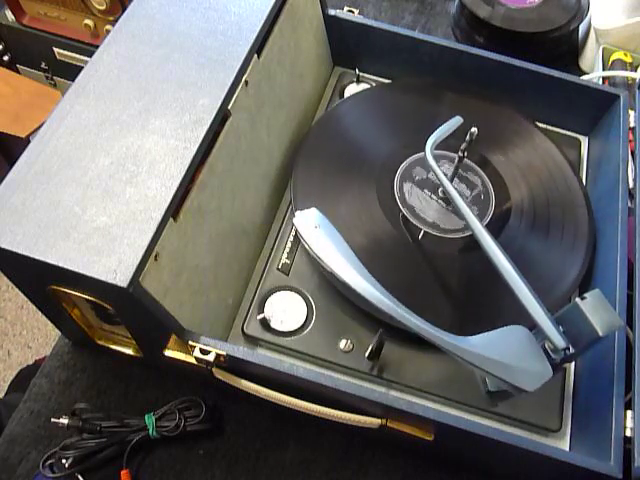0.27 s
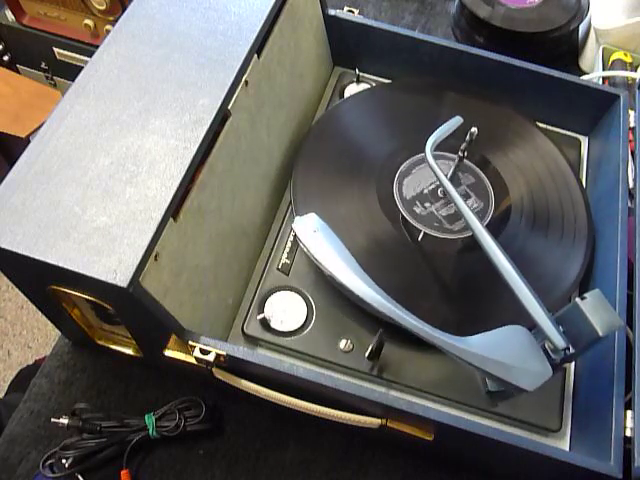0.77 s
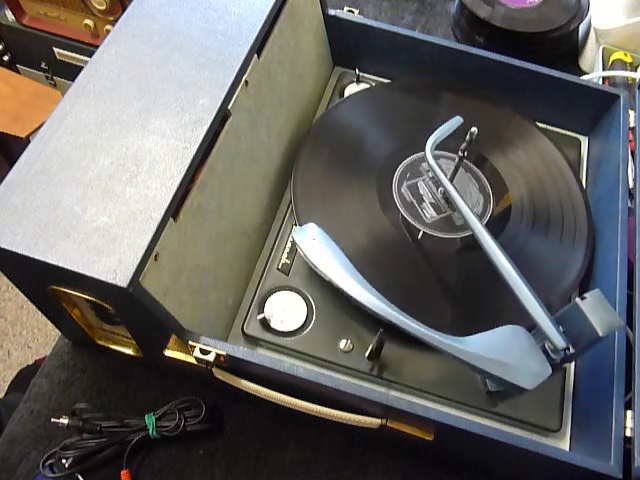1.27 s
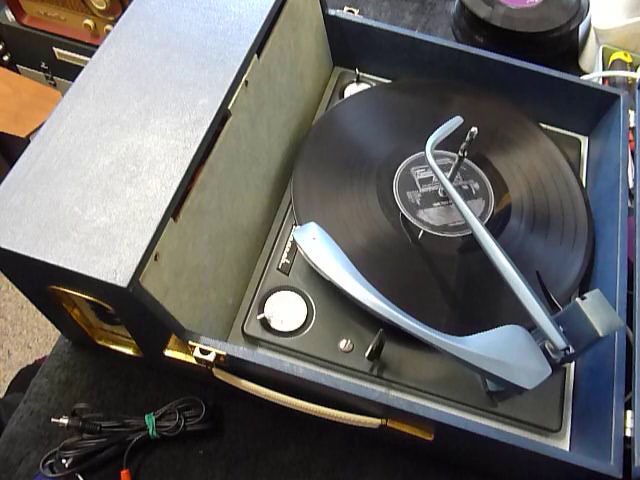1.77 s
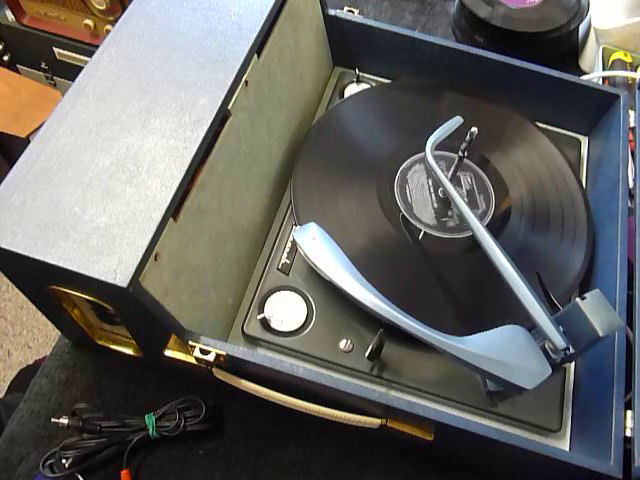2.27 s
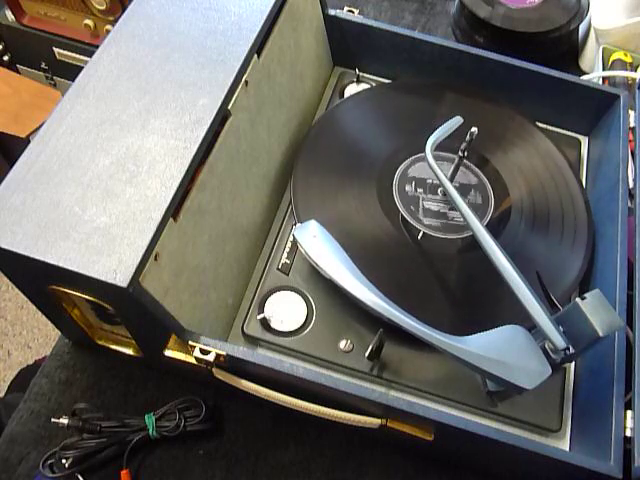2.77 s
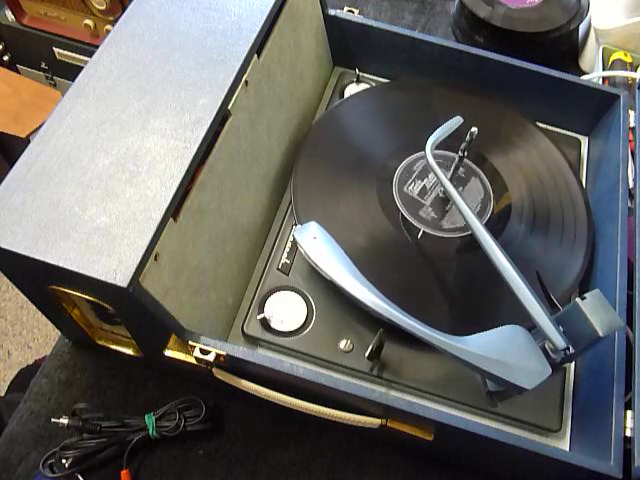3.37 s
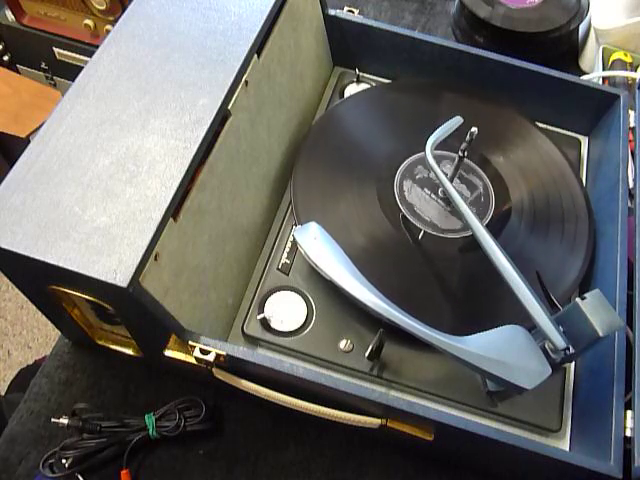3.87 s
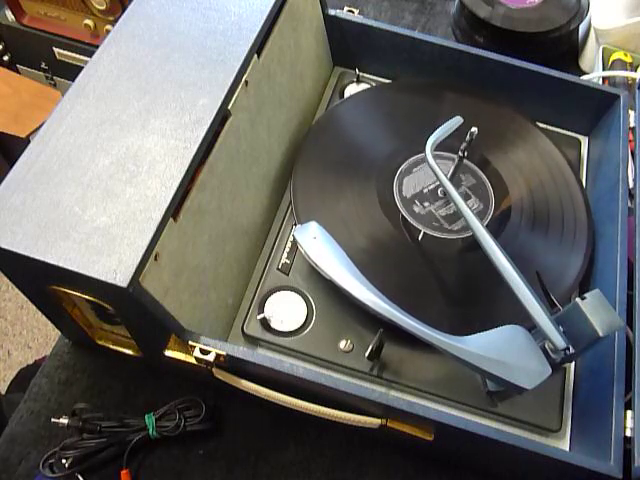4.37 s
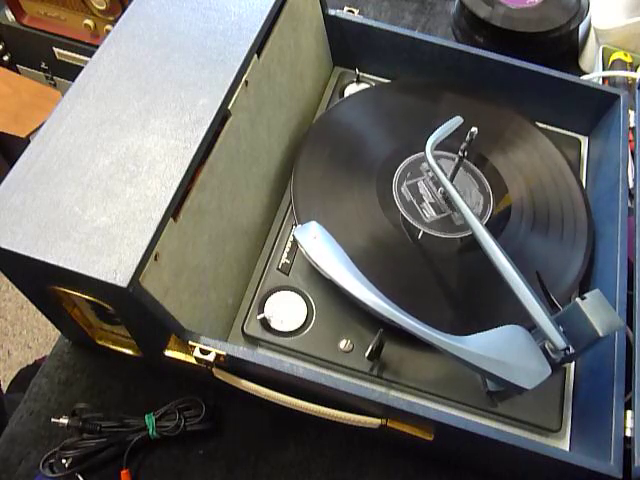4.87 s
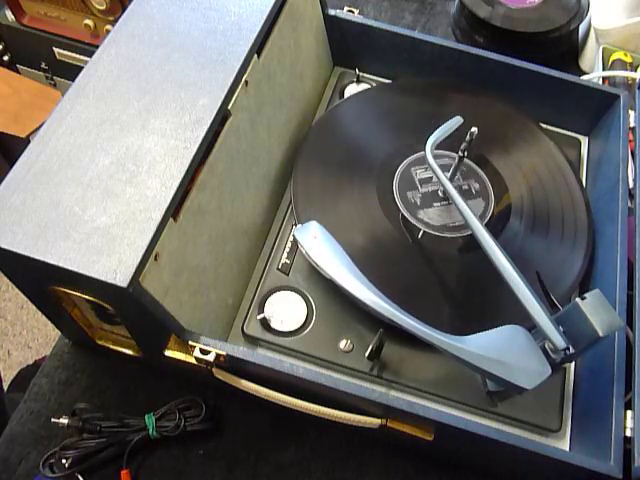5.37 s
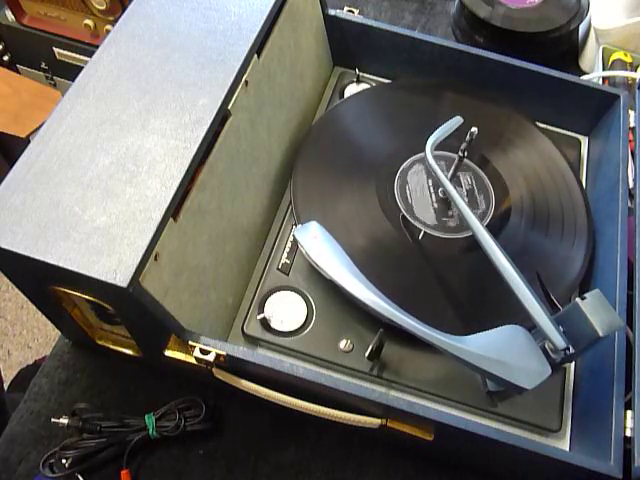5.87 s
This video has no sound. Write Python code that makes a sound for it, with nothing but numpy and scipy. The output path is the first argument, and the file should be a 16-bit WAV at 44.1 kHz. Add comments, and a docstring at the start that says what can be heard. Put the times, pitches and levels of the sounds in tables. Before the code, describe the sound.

A portable record changer's levers slide, snap and knock in a burst near the start, then faint ticks over low hiss until one last knock.

```python
"""Record changer at work

Close on a portable record player in a quiet room: levers slide, snap and knock on its steel deck, set in
a wooden case. Blows ring each part's modes over a noisy rattle; a dragging lever is lumpy resonant noise.
The drive ticks faintly as the platter turns, each tick a burst of noise in three resonant bands.
Under it lie mains hum and a thin electrical whine, both wavering sines, and the shaped-noise hiss of
room and microphone. A short room tail follows the mechanism; the microphone rolls off the treble."""
import sys
import numpy as np
from scipy import signal
from scipy.fft import rfft, irfft, next_fast_len
from scipy.io import wavfile
from scipy.ndimage import uniform_filter1d, map_coordinates

SR = 44100
rng = np.random.default_rng(int(sys.argv[2]) if len(sys.argv) > 2 else 0)


def unload_wav(signal):
    """Save mono or channel-first audio to the path in sys.argv[1] as 16-bit WAV at rate SR, clipped to [-1, 1]."""
    wavfile.write(
        sys.argv[1],
        SR,
        np.round(np.clip(np.atleast_2d(signal).T, -1, 1) * 32767).astype(np.int16),
    )


N = 270509

# Mains harmonics of the motor, mean levels: pitch_hz, rms_level_db
MOTOR_HUM = [(99.9, -70), (149.8, -73), (199.5, -66), (249.9, -70)]
# Thin electrical whine, mean levels: pitch_hz, rms_level_db
ELECTRICAL_WHINE = [(2667, -85.5), (3111, -85.5), (3555, -85.5), (6222, -88), (6667, -88.5), (7887, -82)]
# Spectrum shape of room and microphone hiss: pitch_hz, relative_density_db
HISS_SPECTRUM = [(15, -41.5), (25, -26.5), (70, -21), (135, -10.5), (170, -15.5), (225, -13), (472, -17.5),
                 (674, -20.5), (1010, -24), (3540, -34), (6520, -40), (9500, -35.5)]
HISS_DB = -53  # mean rms level

# Faint ticks of the turning drive: start_s, pip_peak_db, pip_pitch_hz, knock_db (low knock over the pip)
DRIVE_TICKS = [(0.7136, -48, 3420, -20), (1.1174, -54, 2550, -10), (1.216, -58.5, 3520, -12),
               (2.003, -54, 3180, -10), (2.226, -59, 6200, -22), (2.406, -58, 2900, -2),
               (2.621, -48.5, 3100, 5), (2.8835, -48.5, 3140, 6), (3.3228, -50.5, 3200, 3),
               (3.3384, -55.5, 3500, -4), (3.511, -55, 2980, 3), (3.5853, -53, 3140, -3),
               (3.76, -58, 3200, -5), (4.04, -56, 3200, -9), (4.35, -55, 3200, -6), (4.423, -53.5, 3230, 4),
               (4.701, -62, 2870, 15), (4.7327, -50, 2830, 8), (5.091, -51.5, 3200, -5),
               (5.239, -54, 3320, -9), (5.338, -59, 2370, 12), (5.4125, -55, 3180, -5),
               (5.538, -42.5, 3420, -17), (5.895, -50.5, 3040, -3.5)]
PUFF_OVER_DB, PUFF_TOP_DB = 8, 2  # puff level above the knock, and its ceiling above the pip
TICK_T60_S, LONGER_DB = 0.085, 0.4  # decay at 0 dB knock; dB of length per dB of knock

# Dying of the room tail: pitch_hz, t60_s
ROOM_DECAY = [(150, 0.21), (1000, 0.17), (8000, 0.14)]

# Blows of the mechanism: start_s, case_db, board_db, plate_db, light_parts_db,
# brightness_octaves (above the bracket, where light parts lose nothing), rattle_t60_s
MECHANISM_BLOWS = [(0.7946, -67, -60, -49, -41, 1.3, .04), (0.8206, -66, -58, -41, -38.5, 1.36, 0.045),
                   (1.2925, -57, -37, -59, -47, -.2, 0.068), (1.3194, -50, -30, -39, -28, 1.5, .045),
                   (1.342, -61, -47, -44, -37, 0.7, 0.035), (1.355, -60, -48, -48, -41, -1.5, .04),
                   (1.3749, -27, -16.5, -36, -43, -0.5, 0.094), (1.604, -60, -49, -46, -48.5, 1.2, 0.04),
                   (1.626, -61, -35, -32, -30.5, -.2, 0.057),
                   (1.6513, -50, -39.5, -30.5, -21.5, -0.03, 0.051),
                   (1.6830, -35.5, -37, -30, -15, 1.5, .057), (1.6879, -30.5, -29, -28.5, -26, 0.5, 0.074),
                   (1.784, -66, -50, -44, -44, 0, .055), (1.8528, -22, -47, -20.5, -20, 1.63, 0.078),
                   (1.8591, -22, -38, -14, -28.5, 0, 0.04), (5.9460, -39, -28.5, -30.5, -36, -0.3, .066),
                   (5.979, -62, -54, -53, -43.5, -0.1, .04)]
# Modes of the wooden case: pitch_hz, relative_level_db, t60_s
CASE_MODES = [(138.2, -0.5, 0.24), (202.6, -8.5, 0.35), (345, 0.5, 0.24), (426.5, 6.5, 0.091),
              (513, -12.5, 0.13)]
# Modes of the sprung motor board: pitch_hz, relative_level_db, t60_s
BOARD_MODES = [(92, -4, 0.066), (153, -3.5, 0.048), (225, 3, 0.06), (324.5, -3, 0.077), (414, -7, 0.11),
               (490, -10, 0.04), (644, -10, 0.064)]
# Modes of the plate: pitch_hz, relative_level_db, t60_s
PLATE_MODES = [(640, -13, 0.0093), (782, -2, 0.046), (832, -8, 0.073), (1010, -7.5, 0.017),
               (1217, -4.5, 0.07)]
# Modes of the bracket: pitch_hz, relative_level_db, t60_s
BRACKET_MODES = [(1350, -2.5, 0.017), (1540, 0.5, 0.027), (1695, 4, 0.082), (1914, 1, 0.081),
                 (2154, -2, .05)]
# Modes of the steel deck: pitch_hz, relative_level_db, t60_s
DECK_MODES = [(2376, 0.5, 0.045), (2580, 2, 0.031), (2810, 5.5, 0.065), (3290, -0.5, 0.075),
              (3450, 4.5, 0.042), (4000, 0.5, 0.039), (4270, -1, 0.033)]
# Modes of the lever: pitch_hz, relative_level_db, t60_s
LEVER_MODES = [(4800, -11, .04), (5480, -7, .04), (6040, -2.5, 0.056), (5920, -1.5, 0.078),
               (6070, -14.5, 0.037), (6230, -8, 0.037), (6500, -13, 0.017), (7400, -20, 0.019)]
# Light parts (bracket, deck, lever in turn): octaves_above_bracket, readiness_db
LIGHT_PARTS = [(0, 3), (0.87, 1), (1.85, -2.5)]
RISE_S = 0.00071  # time constant of a contact building up
UNDER_DB, OVER_DB = 7.5, 10  # light-part loss: per octave below the brightness, per squared octave above

# A lever dragging along its cam: time_s, grind_rms_db (low), scrape_rms_db (bright)
LEVER_SLIDE = [(1.28, -70, -96), (1.30, -56, -57), (1.33, -47.5, -50), (1.36, -41.5, -51),
               (1.40, -51.5, -61.5), (1.45, -77, -68), (1.60, -78, -86), (1.64, -42.5, -69),
               (1.68, -43, -66), (1.71, -58, -54), (1.74, -51, -51), (1.80, -53, -69), (1.84, -77, -73.5)]

# Microphone treble roll-off: pitch_hz, gain_db
MIC_ROLLOFF = [(6800, -0.5), (7600, -6), (8200, -12), (8700, -27.5), (9000, -40)]
TOP_HZ = 9050  # band limit of the converter
OFFSET = .0069  # standing voltage of the converter, as a share of full scale


def amp(db):
    """Decibels to gain."""
    return 10 ** (np.asarray(db) / 20)


def unit(x):
    """Scaled to rms 1."""
    return x / np.sqrt(np.mean(x ** 2) + 1e-20)


def peak_one(x):
    """Scaled to peak 1."""
    return x / np.max(np.abs(x))


def along(points, hz):
    """Values between (Hz, value) points on a log frequency axis."""
    point_hz, values = np.transpose(points)
    return np.interp(np.log(hz + 1), np.log(point_hz + 1), values)


def curves(rows):
    """One value per sample for each column after the time."""
    s, *columns = np.transpose(rows)
    return [np.interp(np.arange(N) / SR, s, column) for column in columns]


def wobble(rate):
    """A smooth random curve, rate knots a second."""
    knots = rng.standard_normal(int(N * rate / SR) + 4)
    return map_coordinates(knots, [np.arange(N) * rate / SR])


def filtered(x, response):
    """x through a complex response of frequency, padded so the ringing does not wrap."""
    m = next_fast_len(len(x) + 8192)
    return irfft(rfft(x, m) * response(np.fft.rfftfreq(m, 1 / SR)), m)[:len(x)]


def band(f, hz, width_hz):
    """One causal resonance."""
    return 1j * f * width_hz / (hz * hz - f * f + 1j * f * width_hz + 1e-9)


def add(track, s, sound):
    """Mix a sound in at s seconds."""
    track[round(s * SR):][:len(sound)] += sound


def tones(lines, waver_db, drift):
    """Hum or whine: steady sines whose level (dB) and phase (radians) wander a little."""
    t = np.arange(N) / SR
    total = np.zeros(N)
    for hz, db in lines:
        level = np.sqrt(2) * amp(db + waver_db * wobble(5.5))  # rms to peak
        phase = drift * wobble(3.5) + 2 * np.pi * rng.random()
        total += level * np.sin(2 * np.pi * hz * t + phase)
    return total


def hiss():
    """Room air, motor rumble and microphone noise: shaped noise with faint patches in time and pitch."""
    z = signal.stft(rng.standard_normal(N), nperseg=512)[2]
    patches = uniform_filter1d(rng.standard_normal(z.shape), size=8, axis=0)
    patches = uniform_filter1d(patches, size=10, axis=1)
    noise = signal.istft(z * amp(0.87 * unit(patches)), nperseg=512)[1][:N]
    shaped = unit(filtered(noise, lambda f: amp(along(HISS_SPECTRUM, f))))
    return amp(HISS_DB + 0.24 * wobble(7.4)) * shaped


def ticks():
    """A small part touches the deck: decaying noise wakes a short pip, a broad puff and a duller knock."""
    track, t = np.zeros(N + SR), np.arange(SR // 8) / SR
    for s, db, pip_hz, knock_db in DRIVE_TICKS:
        puff_db = min(knock_db + PUFF_OVER_DB, PUFF_TOP_DB)
        t60 = TICK_T60_S * amp(LONGER_DB * knock_db)  # a heavier tick lasts longer
        decay = amp(-60 * t / t60)
        sharpness = 1 + 1.2 * amp(-60 * t / 0.0051)  # sharpest at first contact
        touch = decay * sharpness * rng.standard_normal(len(t))

        def part(hz, width_hz):
            """The touch heard through a doubled resonance."""
            return peak_one(filtered(touch, lambda f: band(f, hz, width_hz) ** 2))

        pip = part(pip_hz, width_hz=410)
        puff = part(hz=1870, width_hz=1960)
        knock = part(hz=910, width_hz=1120)
        add(track, s, amp(db) * (pip + amp(puff_db) * puff + amp(knock_db) * knock))
    return track[:N]


def room(x):
    """The room's answer: a noise tail, each frequency dying at its own speed."""
    hz, t, z = signal.stft(rng.standard_normal(SR // 2), SR, nperseg=256)
    fade = amp(-60 * t / along(ROOM_DECAY, hz)[:, None])
    tail = signal.istft(z * fade, SR, nperseg=256)[1]
    delayed = np.pad(x, (200, 0))  # samples
    return signal.fftconvolve(delayed, tail / np.linalg.norm(tail))[:N]


def ringing(modes, t, scatter_db):
    """A part's impulse response; each blow lands elsewhere and wakes the modes at new strengths."""
    total = np.zeros(len(t))
    for hz, db, t60 in modes:
        level_db = db + scatter_db * rng.standard_normal()
        total += amp(level_db - 60 * t / t60) * np.sin(2 * np.pi * hz * t)
    return total


def struck(modes, push, rattle, t, dense):
    """A part's strong modes woken by the push, plus its crowd of weak ones, as noise after the rattle."""
    low_hz, high_hz = modes[0][0], modes[-1][0]
    middle_hz, width_hz = np.sqrt(low_hz * high_hz), 2.36 * (high_hz - low_hz)
    noise = rattle * rng.standard_normal(len(t))
    crowd = filtered(noise, lambda f: band(f, middle_hz, width_hz) ** 3)
    strong = signal.fftconvolve(push, ringing(modes, t, scatter_db=4.5))[:len(t)]
    return peak_one(peak_one(strong) + dense * peak_one(crowd))


def blows():
    """A blow is a first contact and a dying rattle of loose play; each part takes its share."""
    track, t = np.zeros(N + SR), np.arange(SR // 3) / SR
    octaves, ready_db = np.transpose(LIGHT_PARTS)
    soft = -np.hanning(30)  # heavy parts feel one soft push
    for s, case_db, board_db, plate_db, light_db, bright, rattle_s in MECHANISM_BLOWS:
        away = octaves - bright
        loss_db = np.where(away > 0, OVER_DB * away ** 2, -UNDER_DB * away)
        small_db = light_db + ready_db - loss_db
        rattle = amp(-60 * t / rattle_s) * (1 - np.exp(-t / RISE_S))
        sound = amp(case_db) * struck(CASE_MODES, soft, rattle, t, dense=0.63)
        sound += amp(board_db) * struck(BOARD_MODES, soft, rattle, t, dense=0.18)
        sound += amp(plate_db) * struck(PLATE_MODES, soft[::3], rattle, t, dense=0.54)  # a shorter push
        for db, modes in zip(small_db, (BRACKET_MODES, DECK_MODES, LEVER_MODES)):
            chatter = rattle ** 6 * rng.standard_normal(len(t))  # light parts feel the first contact's chatter
            sound += amp(db) * struck(modes, chatter, rattle, t, dense=2.1)
        add(track, s, sound)
    return track[:N]


def slide():
    """Rough metal on metal: lumpy noise through the parts' resonances."""
    def rub(modes, width_hz):
        """Lumpy noise through one set of modes, alternating in sign."""
        def body(f):
            return sum((-1) ** k * amp(db) * band(f, hz, width_hz) for k, (hz, db, _) in enumerate(modes))
        grit = amp(3.0 * wobble(180)) * rng.standard_normal(N)
        return unit(filtered(grit, body))

    grind_db, scrape_db = curves(LEVER_SLIDE)
    grind = rub(CASE_MODES + PLATE_MODES, width_hz=190)
    scrape = rub(BRACKET_MODES + DECK_MODES + LEVER_MODES, width_hz=560)
    return amp(grind_db) * grind + amp(scrape_db) * scrape


def scene():
    """The mechanism, heard directly and through its room, over the steady sounds."""
    hum = tones(MOTOR_HUM, waver_db=3.0, drift=0.36)
    whine = tones(ELECTRICAL_WHINE, waver_db=1.5, drift=0.29)
    near = ticks() + blows() + slide()
    near = filtered(near, lambda f: (1j * f / (70 + 1j * f)) ** 3)  # a small case radiates little deep bass
    return (hum + whine + hiss() + near + amp(-11.5) * room(near))[None]


def record(dry):
    """The microphone loses treble; the converter cuts at its band limit, adds an offset and faint noise."""
    heard = filtered(dry[0], lambda f: amp(along(MIC_ROLLOFF, f)) * (f < TOP_HZ))
    return heard[None] + OFFSET + amp(-105) * rng.standard_normal((1, N))


dry = scene()
out = record(dry)
unload_wav(out)
```